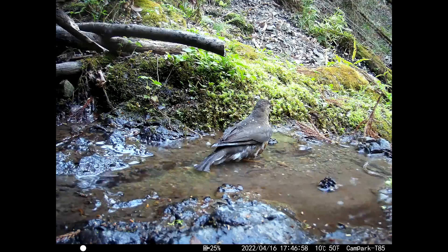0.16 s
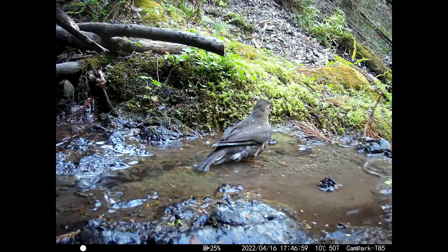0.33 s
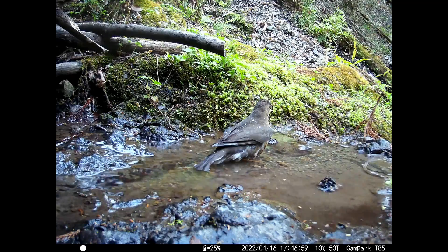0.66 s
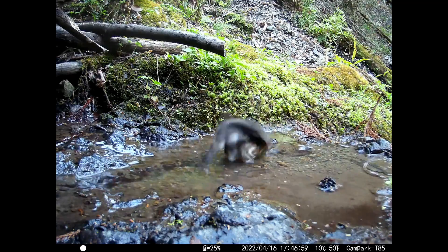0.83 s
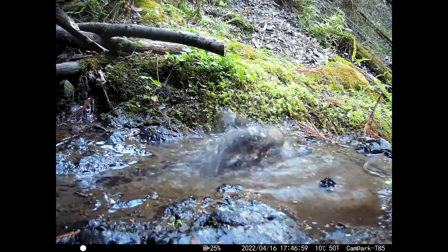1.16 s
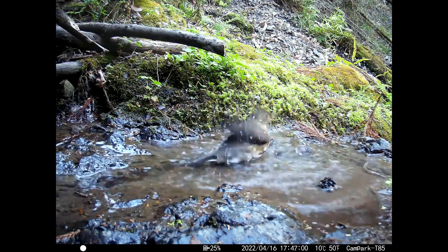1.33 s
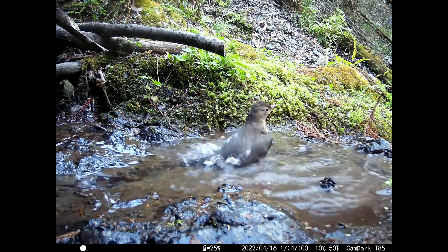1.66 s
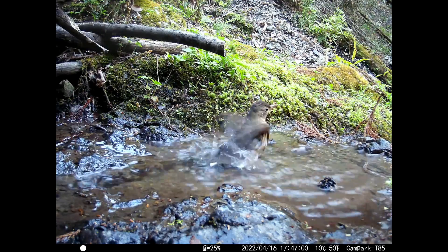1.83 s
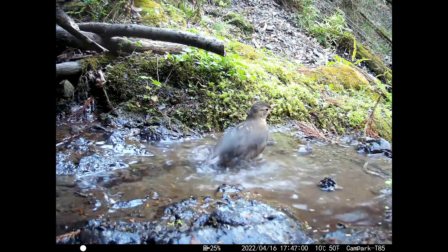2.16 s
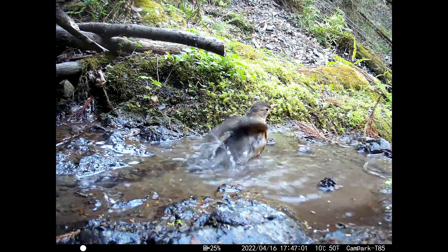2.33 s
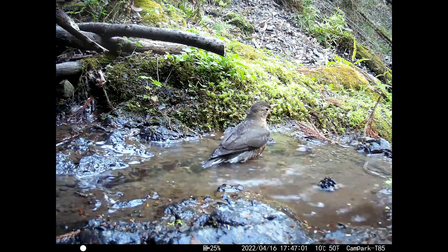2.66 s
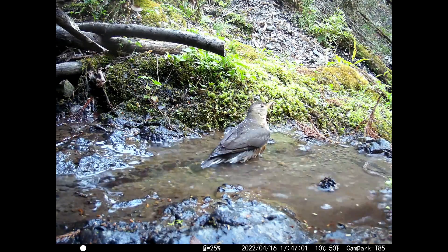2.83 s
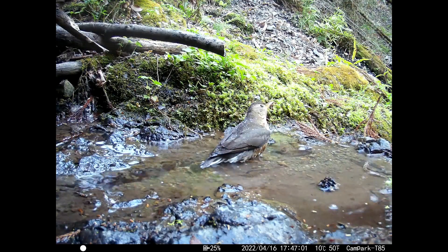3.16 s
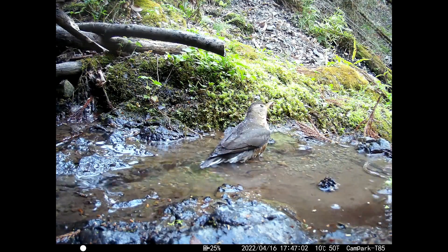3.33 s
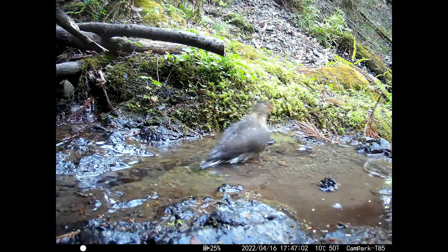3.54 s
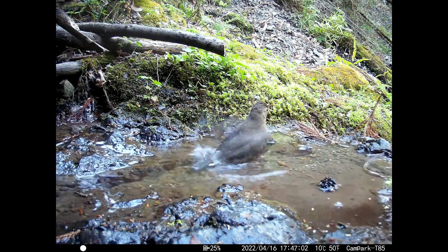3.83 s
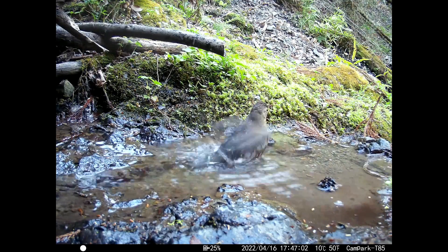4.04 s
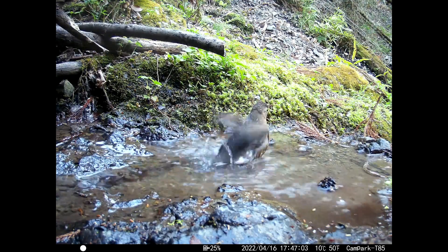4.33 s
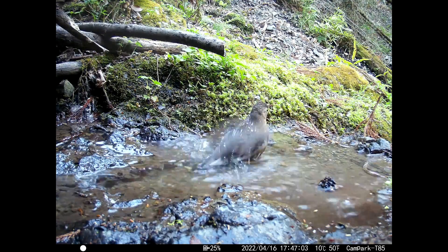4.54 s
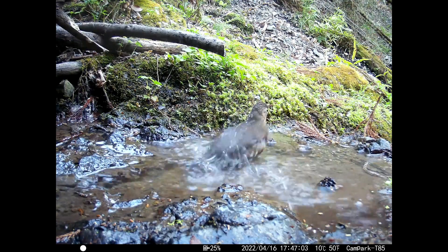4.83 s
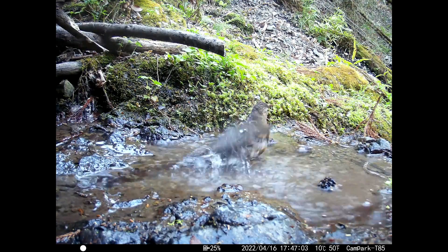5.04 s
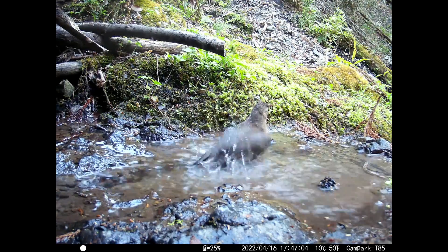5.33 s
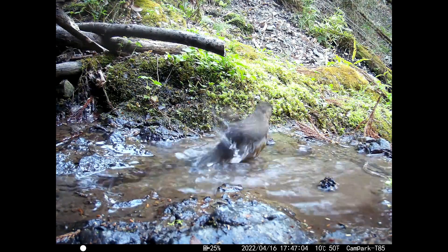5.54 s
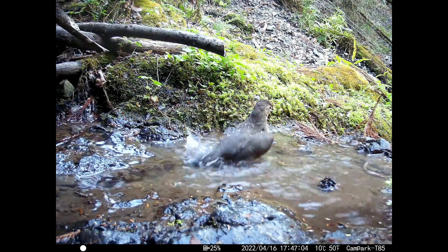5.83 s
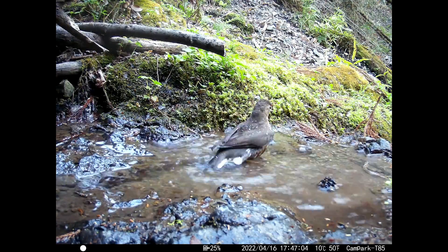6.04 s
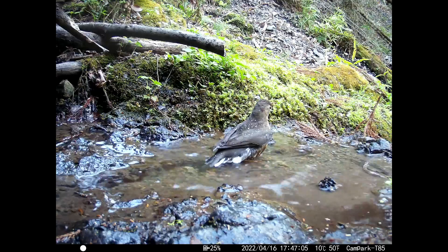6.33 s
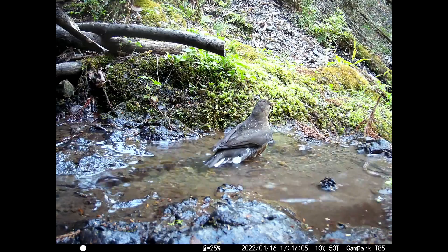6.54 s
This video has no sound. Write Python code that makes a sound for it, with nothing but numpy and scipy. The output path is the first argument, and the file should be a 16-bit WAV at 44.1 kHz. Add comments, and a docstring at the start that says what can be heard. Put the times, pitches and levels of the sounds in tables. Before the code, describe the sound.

A small bird bathes in a shallow forest pool beside a plastic-cased microphone. Faint drips come first, then a sharp hollow splash near two seconds and a few isolated taps. Around four seconds light slaps and plinking drops return, thickening into a fast, loud cluster of wet knocks after five seconds, then thinning to a few last hits. Steady preamplifier hiss and a faint lumpy breeze lie underneath.

```python
"""Sharp wet slaps, plinking drops and hollow knocks: a small bird bathes in a shallow forest pool by a plastic case.
Slaps are short tone bursts, mostly near 1 kHz, mixed with damped case modes; the ticks of spray are clicks with fizz.
Falling drops are random impulses through resonators, then through the narrow port of the microphone.
Wing strokes are low puffs. Lumpy low noise is the breeze, and shaped noise the hiss of the preamplifier."""
import sys
import numpy as np
from scipy import signal
from scipy.io import wavfile

SR = 44100
rng = np.random.default_rng(int(sys.argv[2]) if len(sys.argv) > 2 else 0)


def generate_wav(sig):
    """Save sig (samples, or channels by samples) to the path in sys.argv[1] as 16-bit PCM at SR."""
    pcm = np.round(np.clip(np.atleast_2d(sig).T, -1, 1) * 32767).astype(np.int16)
    wavfile.write(sys.argv[1], SR, pcm)


N = 294878

# Slaps and drops that stand out, peak ahead of the port's treble cut:
# crest t/s, peak/dB, pitch f/Hz, swell (spread of the bell)/ms, case ring over the slap/dB
SPLASH_EVENTS = [(0.067, -53.5, 1090, 2, -27), (0.3415, -58, 940, 1.2, -6), (0.811, -44.5, 1000, 0.62, -15),
                 (0.8923, -55, 1160, 2, 2), (0.906, -49, 1260, 2.6, 5), (0.938, -57, 1060, 0.8, -14),
                 (1.056, -51, 980, 0.77, -26), (1.3427, -58.5, 1020, 3.1, -10), (1.716, -48, 1160, 1.8, 14),
                 (1.804, -46, 1230, 2.3, 5), (1.819, -52, 980, 1.5, -22), (1.952, -56.5, 933, 5.4, -13),
                 (2.0126, -39.5, 940, 1.5, -9), (2.019, -48, 970, 1.9, -23), (2.0564, -24.5, 940, 0.17, 23),
                 (2.0938, -32, 885, 0.71, 11), (2.1275, -40.5, 870, 0.47, 6),
                 (2.1835, -48.5, 1000, 0.67, 4), (2.3094, -47, 890, 0.33, -4),
                 (2.3394, -53.5, 1000, 1.2, -7), (2.7346, -32.5, 1006, 0.65, -10),
                 (2.882, -52, 830, 0.32, 7), (3.5372, -56.5, 1106, 1.9, -23), (3.8016, -46, 980, 0.54, -18),
                 (3.81, -49.5, 980, 0.58, -5), (3.8271, -46.5, 1090, 0.54, -25),
                 (3.9048, -42.5, 980, 0.6, -9), (3.9324, -45.5, 860, 0.56, -7), (3.94, -50, 895, 0.82, -23),
                 (3.943, -33, 855, 0.54, -24), (3.958, -44.5, 804, 0.56, -36), (3.964, -48, 690, 0.48, -7),
                 (3.9984, -49, 1170, 0.3, -21), (4.033, -61, 910, 4.8, 3), (4.2225, -49, 930, 4.8, 6),
                 (4.2336, -39.5, 1120, 0.63, -11), (4.3125, -42.5, 980, 1.1, 2),
                 (4.322, -54.5, 1750, 1.6, -20), (4.3247, -48.5, 980, 0.94, -2),
                 (4.39, -43.5, 920, 0.37, -6), (4.403, -42, 850, 1, -7), (4.439, -53, 940, 5, 1),
                 (4.6666, -47.5, 894, 3.3, -3), (4.7663, -40, 1654, 2.9, 0), (4.814, -50, 1030, 1, -9),
                 (4.8608, -45.5, 896, 2.8, -9), (4.891, -49, 1120, 0.65, -3),
                 (4.9154, -45.5, 1020, 0.21, -8), (4.9247, -46, 1180, 1.3, -2), (4.9514, -47, 1090, 3.1, 1),
                 (4.9881, -33, 1060, 0.43, 7), (5.0311, -47, 915, 2.8, -9), (5.0403, -47, 1020, 0.99, -24),
                 (5.049, -50, 1200, 1.8, -16), (5.0594, -47.5, 960, 2.3, -20),
                 (5.0888, -49, 880, 0.43, -25), (5.102, -22.5, 853, 0.72, -19),
                 (5.1322, -43, 1030, 1.1, -1), (5.1487, -41.5, 1110, 0.93, -3),
                 (5.1542, -36, 880, 0.66, -30), (5.1584, -34, 930, 1.2, 5), (5.1643, -35, 780, 0.5, -6),
                 (5.173, -39, 770, 0.61, 6), (5.1776, -34, 945, 0.27, -27), (5.1818, -46, 900, 0.4, -25),
                 (5.1878, -57, 850, 0.59, -29), (5.2075, -32, 945, 0.56, -32),
                 (5.2421, -27.5, 860, 0.58, -15), (5.2575, -34.5, 796, 2.5, 4),
                 (5.2654, -38, 910, 1.4, -12), (5.28, -39.5, 930, 0.56, -16), (5.364, -52, 950, 1.2, 1),
                 (5.4231, -31.5, 1010, 0.47, 0), (5.4278, -31.5, 675, 0.88, -23),
                 (5.4358, -21.5, 786, 0.63, -5.5), (5.4414, -23.5, 815, 1.1, -10),
                 (5.4501, -19, 730, 0.55, -12), (5.4583, -34, 720, 0.74, -6), (5.475, -38, 800, 0.16, -20),
                 (5.4827, -26.5, 890, 0.68, -23), (5.486, -21, 895, 0.83, -2.5),
                 (5.4909, -23, 928, 4.9, -25), (5.5, -38, 870, 0.28, -20), (5.5102, -35, 830, 0.31, 4),
                 (5.5195, -31, 845, 0.8, -9.5), (5.5372, -44, 960, 0.47, -9),
                 (5.5472, -45, 1030, 0.77, -25), (5.5517, -37, 910, 0.35, -14),
                 (5.6006, -40.5, 920, 0.63, -10), (5.625, -31, 1040, 0.55, -12),
                 (5.6553, -39, 950, 0.77, -34), (5.6697, -27, 980, 0.5, -20), (5.6724, -28, 795, 0.85, -36),
                 (5.7087, -24.5, 950, 0.53, -17), (5.7685, -25.5, 965, 0.46, -40),
                 (5.771, -27, 875, 0.84, -38), (5.825, -19.5, 917, 0.64, -49), (5.857, -46.5, 820, 1, -4),
                 (5.8735, -47, 1000, 2.2, 16), (5.9, -46.5, 930, 0.88, -10), (6.1008, -37, 980, 0.35, -18),
                 (6.1066, -38.5, 940, 0.41, -21), (6.1396, -31.5, 1005, 0.52, -23),
                 (6.1466, -41, 920, 0.47, -33), (6.2074, -36, 1040, 0.53, 3.5),
                 (6.348, -20.5, 985, 0.57, -29), (6.3529, -32, 900, 0.5, -10),
                 (6.361, -27.5, 1070, 0.34, -36), (6.5517, -53.5, 1027, 4.3, -12)]
# Modes of the plastic case: f/Hz, level before pitch and chance weigh it/dB, 60 dB decay t/s
CASE_MODES = [(215, -2, 0.077), (665.7, 0, 0.12), (946, 2.5, 0.053), (1241, 1.5, 0.04), (1662, 0, 0.036),
              (1860, 5, 0.013)]
LEAD = SR // 40   # samples a burst may swell before its crest


def amp(db):
    """Gain of a level in dB."""
    return 10 ** (np.asarray(db) / 20)


def rms_one(x):
    """Scaled to unit power."""
    return x / np.sqrt(np.mean(x ** 2) + 1e-20)


def peak_one(x):
    """Scaled to unit height."""
    return x / np.abs(x).max()


def resonance(x, hz, width_hz):
    """Two-pole band-pass, gain about 1 on top."""
    r = np.exp(-np.pi * width_hz / SR)
    feedback = [1, -2 * r * np.cos(2 * np.pi * hz / SR), r * r]
    return signal.lfilter([(1 - r * r) / 2, 0, (r * r - 1) / 2], feedback, x)


def drift(rate_hz):
    """Slow random wander of spread 1: noise through two equal low-pass poles."""
    r = np.exp(-2 * np.pi * rate_hz / SR)
    noise = rng.standard_normal(N + SR)
    return rms_one(signal.lfilter([1], [1, -2 * r, r * r], noise)[SR:])   # the first second settles


def slap(t, hz, swell_ms):
    """A bell-shaped tone burst with its crest at t = 0."""
    bell = np.exp(-(1000 * t / swell_ms) ** 2 / 2)
    return bell * np.cos(2 * np.pi * hz * t)


def case_ring(t, hz, chance, contact_s, reach=0.46, choke_s=0.02):
    """Modes near the drop's pitch ring most; water detunes them, wet contact starts them softly, a film chokes them."""
    modes_hz, level_db, t60 = np.transpose(CASE_MODES)[:, :, None]
    near_db = np.maximum(-9 * (np.log(modes_hz / hz) / reach) ** 2, -22)
    strength_db = 2 * chance[0][:, None]
    detune = 1 + .02 * chance[1][:, None]
    decay_db = -60 * np.maximum(t, 0) / t60
    rings = amp(level_db + near_db + strength_db + decay_db) * np.cos(2 * np.pi * modes_hz * detune * t)
    start = .5 + .5 * np.tanh(t / contact_s)
    choke = 1 + (np.maximum(t, 0) / choke_s) ** 6
    # neighbouring modes swing against each other
    modes = rings[::2].sum(axis=0) - rings[1::2].sum(axis=0)
    return peak_one(modes * start / choke)


def splashes(body_db=-18.5, body_hz=400):
    """Each splash is a slap plus the ring of the case; short slaps that ring little carry a dull body under them."""
    out = np.zeros(N + SR)
    t = np.arange(-LEAD, SR // 10) / SR
    chance = rng.standard_normal((len(SPLASH_EVENTS), 2, len(CASE_MODES)))
    body = slap(t, body_hz, swell_ms=0.075)
    for (s, peak_db, hz, swell_ms, ring_db), luck in zip(SPLASH_EVENTS, chance):
        dryness = 1 / (1 + amp(ring_db)) ** 2 / (1 + swell_ms ** 2)
        ring = case_ring(t, hz, luck, contact_s=swell_ms / 1000)
        splash = slap(t, hz, swell_ms) + amp(body_db) * dryness * body + amp(ring_db) * ring
        i = round(s * SR) - LEAD
        out[i:i + len(t)] += amp(peak_db) * peak_one(splash)
    return out[:N]


def spray_tick(t, noise, hz=2050, width_hz=1700, fall_ms=1.0, pip_hz=2680, pip_db=-13.5, pip_ms=9.0):
    """A bright click with a few milliseconds of fizz after it and a small pitched pip of chance strength."""
    fizz = 1.05 * noise * (t > 0) * np.exp(-1000 * np.abs(t) / fall_ms)
    click = (t == 0) + fizz
    bright = peak_one(resonance(resonance(click, hz, width_hz), hz, width_hz))
    pip = np.abs(noise[0]) * np.sin(2 * np.pi * pip_hz * t) * np.exp(-1000 * t / pip_ms)
    return peak_one(bright + amp(pip_db) * pip)


def spray(slap_tick_db=-34.5):
    """Fine spray ticks on the case, and a faint tick comes with every splash, set below its peak."""
    # Fine spray ticks ahead of the port's treble cut: t/s, peak/dB
    fine_ticks = [(0.906, -67), (2.0568, -52.5), (2.0945, -55), (2.732, -57), (4.4016, -54.5), (4.763, -54),
                  (4.8136, -54), (4.854, -55), (4.9512, -47), (5.0475, -48), (5.1488, -42), (5.206, -49),
                  (5.2405, -45.5), (5.2562, -43.5), (5.4256, -50), (5.4805, -49), (5.49, -44),
                  (5.671, -44.5), (5.7074, -39), (5.7692, -50), (6.2066, -53), (6.3466, -46)]
    slap_ticks = [(s, peak_db + slap_tick_db) for s, peak_db, *_ in SPLASH_EVENTS]
    ticks = [*fine_ticks, *slap_ticks]
    out = np.zeros(N + SR)
    t = np.arange(SR // 50) / SR
    noises = rng.standard_normal((len(ticks), len(t)))
    for (s, peak_db), noise in zip(ticks, noises):
        i = round(s * SR)
        out[i:i + len(t)] += amp(peak_db) * spray_tick(t, noise)
    return out[:N]


def shower(level_db=-44.0, squeeze=.6, fall_s=.006, dry_db=-14.0):
    """Gain of the water each splash throws up: loud ones throw less than their share, dry taps less still."""
    thrown = np.zeros(N)
    for s, peak_db, *_, ring_db in SPLASH_EVENTS:
        dry_cut_db = dry_db / (1 + amp(ring_db + 35))   # full cut where the case hardly rings
        thrown[round(s * SR)] += amp(level_db + squeeze * peak_db + dry_cut_db)
    r = np.exp(-1 / (fall_s * SR))
    return signal.lfilter([np.e * (1 - r)], [1, -2 * r, r * r], thrown)   # swells, then dies


def patter(per_s=400, size_db=1.0, clump_db=5.5, cycles=6.4, spray_db=-13.0, port_hz=980, port_width_hz=215):
    """Small drops fall back in clumps; each rings a few cycles at a pitch of its own, heard through the port."""
    # Stirred water, to which the shower of each splash adds: t/s, patter level/dB
    stirring = [(0.0, -85), (0.18, -82), (0.34, -73.5), (0.62, -93), (0.84, -73.5), (0.97, -73), (1.4, -76),
                (2.16, -65.5), (2.38, -84.5), (2.9, -69), (3.22, -100), (3.78, -85), (4.02, -69.5),
                (4.28, -69), (4.53, -73.5), (5.25, -59.5), (5.87, -72), (6.37, -62.5), (6.69, -77)]
    s, level_db = np.transpose(stirring)
    sizes = amp(size_db * np.minimum(rng.exponential(1, N), 4)) * rng.choice([-1, 1], N)
    falls = rng.random(N) < per_s * amp(clump_db * drift(15)) / SR
    drops = sizes * falls + 1e-18
    pitches_hz = np.geomspace(500, 1600, 12)
    dealt = rng.integers(0, 12, N)   # which pitch each drop gets
    plinks = sum(resonance(drops * (dealt == k), hz, hz / cycles) for k, hz in enumerate(pitches_hz))
    through_port = rms_one(resonance(plinks, port_hz, port_width_hz))
    # the same drops also tick, higher and fainter
    ticks = rms_one(resonance(resonance(drops, 2050, 520), 2050, 520))
    stirred = amp(np.interp(np.arange(N) / SR, s, level_db))
    return (stirred + shower()) * (through_port + amp(spray_db) * ticks)


def pushes():
    """Wing strokes push air at the port: low bell-shaped puffs, from about one cycle to several."""
    # Wing strokes ahead of the port's treble cut: crest t/s, peak/dB, pitch f/Hz, swell (spread of the bell)/ms
    strokes = [(1.14, -68.5, 249, 22), (2.068, -62, 187, 14), (2.736, -59.5, 260, 3.6),
               (4.994, -61, 207, 2.2), (5.102, -41.5, 210, 2.2), (5.442, -40.5, 91.5, 7),
               (5.6725, -55, 198, 2.8), (5.8281, -42.5, 210, 1.6), (6.36, -56, 207, 1.5)]
    out = np.zeros(N + SR)
    t = np.arange(-LEAD, SR // 10) / SR
    for s, peak_db, hz, swell_ms in strokes:
        i = round(s * SR) - LEAD
        out[i:i + len(t)] += amp(peak_db) * slap(t, hz, swell_ms)
    return out[:N]


def breeze(lumps_db=3.5, bumps_per_s=12, bump_size=40):
    """Breeze on the case: lumpy low noise with soft bumps at random moments."""
    # Course of the breeze, about which the lumps wander: t/s, rumble level/dB
    course = [(0, -77.5), (1.3, -79), (1.47, -71), (1.75, -76.5), (3.2, -82.5), (4.6, -79), (5.3, -76),
              (6.69, -78.5)]
    s, level_db = np.transpose(course)
    bumps = rng.random(N + SR) < bumps_per_s / SR
    gusts = rng.standard_normal(N + SR) * (1 + bump_size * bumps)
    rumble_band = signal.butter(2, [32, 150], "band", fs=SR, output="sos")
    rumble = rms_one(signal.sosfilt(rumble_band, gusts)[SR:])
    return amp(np.interp(np.arange(N) / SR, s, level_db) + lumps_db * drift(8.8)) * rumble


def hiss(hiss_db=-66):
    """Preamplifier hiss: steady noise built from third-octave bands that follow a smooth curve."""
    # Colour of the hiss: f/Hz, relative level per Hz/dB
    colour = [(90, -19), (200, -1), (480, -8.5), (760, -8), (1000, -1.5), (1300, -16.5), (1600, -17),
              (2000, -7.5), (2750, -5.5), (13000, -6.5), (15500, -9)]
    at_hz, level_db = np.transpose(colour)
    edges_hz = 100 * 2 ** np.arange(0, 7.7, 1 / 3)
    white = rng.standard_normal((2, N + SR // 2))
    out = 0
    for k, (low, high) in enumerate(zip(edges_hz, edges_hz[1:])):
        band_pass = signal.butter(3, [low, high], "band", fs=SR, output="sos")
        band = signal.sosfilt(band_pass, white[k % 2])   # neighbours draw on different noise
        band_db = np.interp(np.log(low * high) / 2, np.log(at_hz), level_db)
        out = out + amp(band_db) * band[-N:]
    return amp(hiss_db) * rms_one(out)


def scene(port_top_hz=3580):
    """Water and wing strokes, their treble dulled by the port, over breeze and hiss."""
    water = splashes() + spray() + pushes() + patter()
    port = signal.butter(2, port_top_hz, fs=SR, output="sos")
    return (signal.sosfilt(port, water) + breeze() + hiss())[None]


def record(dry, stop_hz=15850):
    """A steep low-pass cuts the top, 45 dB down from stop_hz upward."""
    top_cut = signal.cheby2(14, 45, stop_hz, fs=SR, output="sos")
    return signal.sosfilt(top_cut, dry)


dry = scene()
out = record(dry)
generate_wav(out)
```